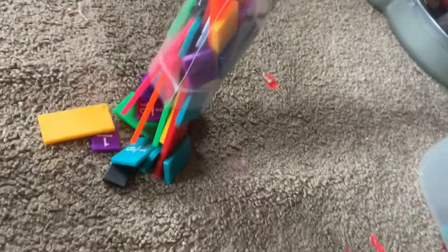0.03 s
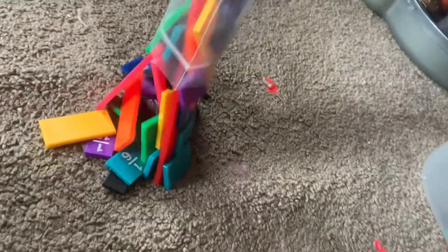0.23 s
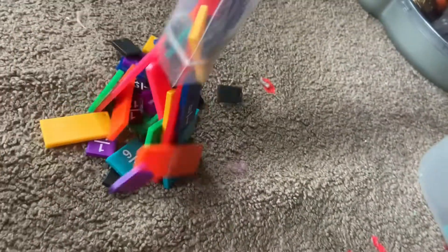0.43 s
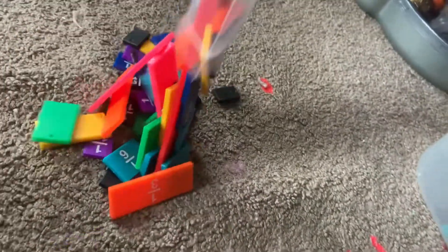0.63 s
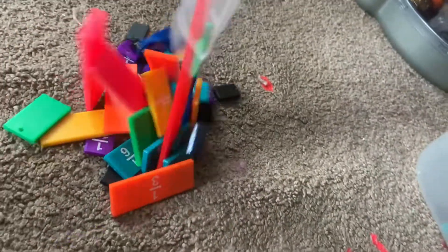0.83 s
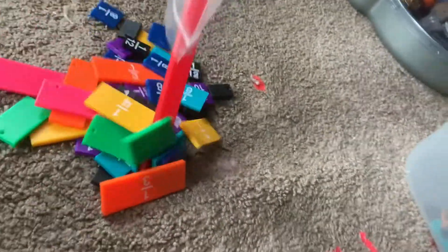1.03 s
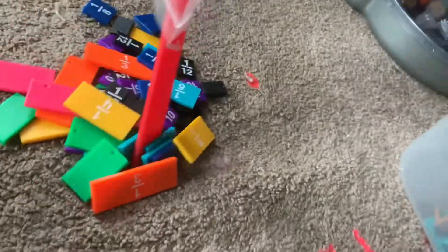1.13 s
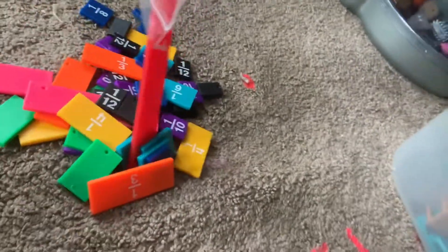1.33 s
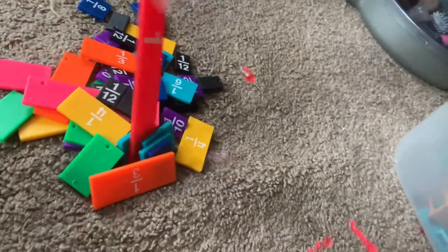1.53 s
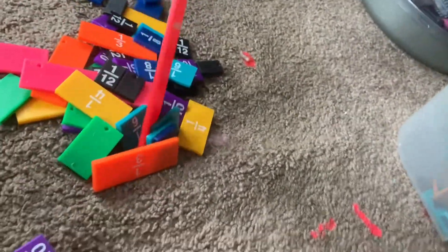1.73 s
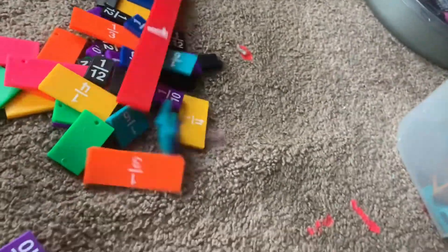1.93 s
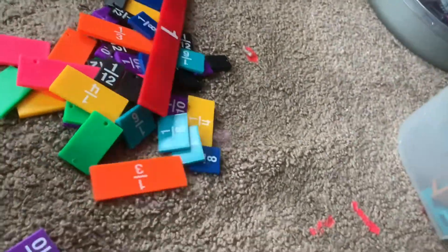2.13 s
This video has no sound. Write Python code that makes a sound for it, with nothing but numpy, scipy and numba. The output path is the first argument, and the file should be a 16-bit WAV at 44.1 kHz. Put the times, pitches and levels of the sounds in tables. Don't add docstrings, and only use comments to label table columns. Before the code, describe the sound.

Plastic tiles spill from a crinkling thin bag in a bright, dense clatter, thudding softly on carpet; after a quiet pause a long tile topples with a sharp clack. Close handheld phone, quiet room.

```python
import sys
import numpy as np
from scipy import signal
from scipy.fft import rfft, irfft
from scipy.io import wavfile
from scipy.ndimage import uniform_filter1d
from numba import njit

SR = 44100
rng = np.random.default_rng(int(sys.argv[2]) if len(sys.argv) > 2 else 0)


def gain_from_db(level_db):
    decades = np.asarray(level_db, float) / 20
    return 10 ** decades


def store_pcm(level_fs):
    pcm = np.round(np.clip(level_fs, -1, 1) * 32767).astype(np.int16)
    wavfile.write(sys.argv[1], SR, np.atleast_2d(pcm).T)


N = 97020

# (frequency [Hz], level [dB], time to fade by 60 dB [s])
TILE_MODES = [(1414, -8.5, 0.051), (1625, -2, 0.083), (2540, -9, 0.038), (2925, -15, 0.08),
              (3400, 1.5, 0.12), (3733, 14.5, 0.015), (4380, -5, 0.13), (4820, -56, 0.011),
              (5810, 7.5, 0.0058), (6170, -5, 0.12), (6210, 5.5, 0.16), (6580, 1.5, 0.063),
              (6800, -13, 0.027), (8142, -2, 0.17)]
# (frequency [Hz], level [dB])
CRACK_COLOUR = [(300, -61), (650, -16), (1050, -1.5), (3000, -0.5), (5500, 3), (8500, 0), (9500, -11),
                (14000, -16)]


def curve(table):
    points = np.array(table)
    return np.interp(np.arange(N) / SR, points[:, 0], points[:, 1])


def unit(x):
    return x / np.sqrt(np.mean(x ** 2))


def colour(x, table):
    hz = np.arange(N // 2 + 1) * SR / N + 1
    points = np.array(table)
    level_db = np.interp(np.log(hz), np.log(points[:, 0]), points[:, 1])
    return irfft(rfft(x) * gain_from_db(level_db), N)


def band(x, lo_hz, hi_hz):
    return signal.sosfilt(signal.butter(2, [lo_hz, hi_hz], "bandpass", fs=SR, output="sos"), x)


@njit
def rings(start, hz, t60, size, rise, n, sr):
    y = np.zeros(n)
    for k in range(len(start)):
        turn = np.exp(2j * np.pi * hz[k] / sr - np.log(1000.) / (t60[k] * sr))
        z = size[k] + 0j
        swell = 0.
        first = int(start[k] * sr)
        for i in range(max(first, 0), min(n, first + int(t60[k] * sr))):
            swell += (1 - swell) / (1 + rise[k] * sr)
            y[i] += swell * z.imag
            z *= turn
    return y


def ring(t, hz, t60, size, rise):
    every = np.broadcast_arrays(t, hz, t60, size, rise)
    flat = [np.ascontiguousarray(v, float).ravel() for v in every]
    return rings(*flat, N, float(SR))


def walk(rate):
    k = int(SR / rate)
    stairs = np.repeat(rng.standard_normal(N // k + 1), k)
    return unit(uniform_filter1d(uniform_filter1d(stairs, k), k)[:N])


def clicks(count, spread_db):
    u = rng.random((count, 3))
    size = gain_from_db(np.minimum(-spread_db * np.log(u[:, 1] + 1e-9), 18))
    x = np.zeros(N)
    np.add.at(x, (u[:, 0] * N).astype(int), size * np.sign(u[:, 2] - .5))
    return x


def crack_noise(kick, fade_s):
    gate = signal.lfilter([1], [1, -np.exp(-1 / (fade_s * SR))], kick)
    return colour(gate * rng.standard_normal(N), CRACK_COLOUR)


def thuds(table, cycles, db):
    events = np.array(table)
    ratio = np.array([1, 1.55])
    hz = events[:, 2:] * ratio
    size = gain_from_db(events[:, 1:2] + db - 22.4 * (ratio - 1))
    return ring(events[:, :1], hz, 2.93 * cycles / hz, size, 0.76 / hz)


def room():
    # (frequency [Hz], level [dB])
    room_colour = [(30, -13), (60, -29.5), (110, -7.5), (430, -0.5), (640, -20), (1500, -16.5),
                   (4000, -64.5), (14000, -46)]
    noise = rng.standard_normal((3, N))
    flutter_db = 2 * walk(9)
    ports = [colour(noise[0] + 1.6 * own, room_colour) for own in noise[1:]]
    return gain_from_db(-58.5 + flutter_db) * unit(np.array(ports))


def hand():
    # (time [s], level [dB])
    grip = [(0, -37), (.1, -41.5), (.5, -48), (.78, -48.5), (.9, -50), (1.1, -51), (1.5, -50.5),
            (1.68, -48.5), (2.2, -51.5)]
    noise = rng.standard_normal((3, N))
    low = band(0.45 * noise[0] + noise[1:], 43, 131)
    level_db = curve(grip) - 4 + 3.04 * walk(11.72)
    port_db = np.array([[1.5], [-1.2]])
    return gain_from_db(level_db) * unit(low) * gain_from_db(port_db)


def hand_knocks():
    # (time [s], peak level [dB], pitch [Hz])
    bumps = [(0.039, -52, 94.2), (0.07, -39, 85), (0.2, -46, 120), (0.361, -45, 86), (0.416, -35.5, 82.6),
             (0.642, -55, 71), (0.761, -36, 91), (0.895, -42.5, 92), (1.881, -49, 100), (1.973, -36, 76)]
    return thuds(bumps, cycles=4.46, db=2.5)


def bag():
    # (time [s], level [dB])
    handling = [(0, -38.5), (.05, -41), (.13, -41.5), (.4, -43), (.46, -52.5), (.6, -43.5), (1.1, -51),
                (1.31, -49), (1.34, -74.5), (1.43, -71.5), (1.465, -49.5), (1.52, -76.5), (1.56, -50.5),
                (1.7, -56), (1.75, -92), (1.79, -49), (1.97, -42.5), (2.12, -48.5)]
    # (frequency [Hz], level [dB])
    film_colour = [(250, -6.5), (450, -0.5), (650, -13), (1050, 2), (2400, -0.5), (3200, -8.5),
                   (6500, -12.5), (9500, -35)]
    flicker_db = 2.5 * walk(45)
    film = unit(colour(clicks(count=6000, spread_db=4.0), film_colour))
    return gain_from_db(curve(handling) + 1.5 + flicker_db) * film


def landings():
    # (time [s], peak level [dB], pitch [Hz])
    falls = [(0.017, -32, 426), (0.051, -28.5, 397), (0.26, -41.5, 440), (0.605, -33.5, 345),
             (0.787, -34.5, 293), (1.001, -37, 225), (1.16, -38.5, 390), (1.597, -36, 356),
             (1.859, -28, 440), (1.86, -27, 706), (1.968, -35.5, 440), (2.19, -37.5, 304)]
    return thuds(falls, cycles=2.4, db=8.5)


def ticks():
    # (time [s], peak level [dB], pitch [Hz])
    snaps = [(0.015, -19, 1210), (0.033, -12.5, 1740), (0.038, -22, 2040), (0.2, -18.5, 1260),
             (0.328, -33, 3880), (0.373, -25, 3860), (0.503, -16, 3900), (0.571, -24, 2040),
             (0.583, -30, 3920), (0.695, -27, 2110), (0.701, -28, 1120), (0.763, -21, 2510),
             (0.795, -29, 3640), (0.81, -17, 1510), (0.831, -32, 2490), (0.84, -27, 3670),
             (0.892, -31, 3660), (0.923, -42, 3700), (1.139, -33, 1620), (1.243, -33, 1820),
             (1.351, -32, 2230), (1.365, -61, 1150), (1.375, -58.5, 1800), (1.421, -41, 1490),
             (1.442, -48, 1100), (1.462, -35.5, 1780), (1.493, -43.5, 1440), (1.532, -55.5, 1310),
             (1.559, -37, 1360), (1.578, -44, 915), (1.61, -46, 1670), (1.631, -37, 856),
             (1.665, -41, 1720), (1.68, -48, 1130), (1.698, -50, 1550), (1.787, -30, 2410),
             (1.817, -37, 940), (1.967, -18, 2040), (2.161, -26.5, 1440)]
    ring_db, crack_db, cycles = 1.5, -3, 5
    events = np.array(snaps)
    kick = np.zeros(N)
    kick[(events[:, 0] * SR).astype(int)] = gain_from_db(events[:, 1] + crack_db)
    hz = events[:, 2:] * np.array([1, 1.6])
    knock = ring(events[:, :1], hz, cycles / hz, gain_from_db(events[:, 1:2] + ring_db), .0001)
    return knock + crack_noise(kick, fade_s=0.0004)


def pings():
    # (time [s], peak level [dB], pitch [Hz])
    strikes = [(0.0374, -32, 4380), (0.0777, -26, 6370), (0.0984, -21.5, 6290), (0.1361, -24, 6710),
               (0.158, -38, 6200), (0.2304, -12.5, 6290), (0.2424, -24, 6170), (0.2734, -16, 6170),
               (0.2964, -19, 6250), (0.4094, -28, 6720), (0.4933, -27, 6250), (0.6135, -12, 6260),
               (0.6474, -14, 6190), (0.6574, -24, 6300), (0.7004, -38, 6210), (0.7294, -30, 4460),
               (0.7494, -22, 6290), (0.8214, -17, 6270), (0.8504, -14, 6280), (0.8584, -25.5, 6260),
               (0.8654, -23, 6310), (0.8794, -24, 6770), (0.9113, -20.5, 6260), (0.9398, -15.5, 6290),
               (1.1374, -29.5, 6230), (1.1682, -40.5, 6290), (1.9174, -19, 6760), (1.9294, -33, 6290)]
    events = np.array(strikes)
    hz = events[:, 2:] * np.array([1, 1.025])
    size = gain_from_db(events[:, 1:2] - 5.5 + np.array([0, -6.0]))
    return ring(events[:, :1], hz, 0.033, size, 0.0017)


def rattle(count=1300):
    # (time [s], level [dB])
    pouring = [(0, -37), (.21, -38.5), (.26, -34.5), (.34, -36.5), (.46, -46.5), (.568, -44.5), (.572, -35),
               (.65, -33.5), (.74, -38.5), (.80, -32), (.89, -36), (.97, -33.5), (1.06, -41.5),
               (1.2, -53.5), (1.28, -68), (1.33, -74.5), (1.76, -76)]
    # (time [s], level [dB])
    toppling = [(1.76, -75), (1.785, -58), (1.85, -49.5), (1.9, -30), (1.95, -38), (2.0, -46),
                (2.015, -33.5), (2.1, -58.5), (2.2, -52.5)]
    mode_hz, mode_db, mode_t60 = np.array(TILE_MODES).T
    u = rng.random((count, 2))
    g = rng.standard_normal((count, 3, len(TILE_MODES)))
    contact_db = np.minimum(-3.0 * np.log(u[:, 1:] + 1e-9), 8)
    size = gain_from_db(contact_db + mode_db + 5.0 * np.clip(g[:, 0], -3, 1.5))
    hz = mode_hz * (1 + .014 * g[:, 1])
    t60 = .75 * mode_t60 * np.exp(.25 * g[:, 2])
    modes = ring(u[:, :1] * N / SR, hz, t60, size, .0006)
    flicker_db = 2.5 * walk(60)
    crack = unit(colour(clicks(count=3500, spread_db=1.5), CRACK_COLOUR))
    level_db = curve(pouring + toppling[1:]) + flicker_db
    return gain_from_db(level_db) * (unit(modes) + gain_from_db(-1.5) * crack)


def hits(count=7):
    # (time [s], peak level [dB], ringing tone [Hz], length of the clatter [s])
    pour = [(0.0173, -22, 7050, 0.008), (0.1783, -19.5, 6240, 0.01), (0.198, -27, 6260, 0.0072),
            (0.2498, -17.5, 6380, 0.008), (0.2664, -22, 6500, 0.0092), (0.3298, -23, 6170, 0.0066),
            (0.3747, -18, 4405, 0.0025), (0.5723, -25, 7240, 0.0069), (0.636, -16.5, 6170, 0.0063),
            (0.6918, -11, 5720, 0.01), (0.7647, -27, 7100, 0.008), (0.7826, -14.5, 6180, 0.0073),
            (0.8089, -15, 6120, 0.003), (0.9482, -19, 5940, 0.006), (0.9678, -17, 6300, 0.0058),
            (0.9956, -26.5, 6600, 0.0094), (1.0182, -20.5, 6700, 0.007), (1.052, -21.5, 3890, 0.01),
            (1.0885, -24, 3940, 0.011)]
    # (time [s], level [dB], tone [Hz], length [s])
    settle = [(1.2518, -32.5, 4500, 0.006), (1.2731, -28.5, 6450, 0.0068), (1.7796, -35, 5180, 0.0081),
              (1.855, -20.5, 4460, 0.0087), (1.8869, -19, 6510, 0.014), (1.897, -10.5, 6700, 0.006),
              (1.9128, -14, 7080, 0.006), (1.9718, -49, 4380, 0.006), (2.009, -23.5, 4370, 0.0048),
              (2.0333, -37, 6300, 0.006), (2.0794, -36.5, 5870, 0.0029), (2.161, -39, 4560, 0.0057),
              (2.1924, -29.5, 2530, 0.005)]
    # (time [s], peak level [dB], pitch [Hz])
    long_tiles = [(0.3114, -25.5, 2900), (0.6457, -26, 1635), (0.9651, -20.5, 1603), (1.004, -27, 2940),
                  (1.0541, -26, 1695), (1.1029, -28.5, 1620), (1.229, -48, 2900), (1.9036, -24, 1430),
                  (1.917, -32, 1570), (1.9395, -27, 1575)]
    ring_db, body_db, others_db, crack_db = -9, -1, -26, -16
    events = np.array(pour + settle)
    mode_hz, mode_db, mode_t60 = np.array(TILE_MODES).T
    u = rng.random((len(events), count))
    g = rng.standard_normal((len(events), count, 30))

    late = np.sort(u, 1) - u.min(1, keepdims=True)
    t = events[:, :1] + events[:, 3:] * late
    size = gain_from_db(events[:, 1:2] + 2.5 * g[..., 0] - 1.5 * late)

    strong_hz = events[:, 2:3] * (1 + 0.0018 * g[..., 1])
    strong = ring(t, strong_hz, 0.014, size * gain_from_db(ring_db), 0.00045)

    other_hz = mode_hz * (1 + .03 * g[..., 2:16])
    other_size = size[..., None] * gain_from_db(others_db + mode_db * 0.54 + 2.5 * g[..., 16:])
    others = ring(t[..., None], other_hz, .5 * mode_t60, other_size, 0.00017)

    big = np.array(long_tiles)
    bodies = ring(big[:, 0], big[:, 2], 0.047, gain_from_db(big[:, 1] + body_db), 0.0017)

    kick = np.zeros(N + SR)
    np.add.at(kick, (t * SR).astype(int), size)
    cracks = crack_noise(kick[:N], fade_s=0.00099)
    return strong + others + bodies + gain_from_db(crack_db) * cracks


def reflections(sound, count=24):
    k = np.arange(SR // 8) / SR
    fade = np.exp(-np.log(1000) * k / .06) * (k > .001)
    tail = rng.standard_normal((count + 1, 2, len(k))) * fade
    tail = tail / np.sqrt((tail ** 2).sum(2, keepdims=True))
    place = np.arange(N) * count / N
    share = np.clip(1 - np.abs(place - np.arange(count + 1)[:, None]), 0, 1) ** .5
    return signal.fftconvolve((share * sound)[:, None], tail, axes=2)[..., :N].sum(0)


def scene():
    tile_lag, film_lag = 20, 9
    tiles = rattle() + hits() + ticks() + pings()
    film = bag()
    thud = landings()
    right = tiles + film + thud
    left = np.roll(tiles, tile_lag) + np.roll(film, film_lag) + thud
    direct = np.array([gain_from_db(1.45) * left, right])
    return direct + gain_from_db(-5) * reflections(right) + hand() + hand_knocks() + room()


def roll_off(x):
    return signal.sosfilt(signal.butter(12, 15600, fs=SR, output="sos"), x)


def record(dry):
    top_hz = 10250
    left = signal.sosfiltfilt(signal.butter(2, top_hz, fs=SR, output="sos"), dry[0])
    right = signal.sosfiltfilt(signal.butter(3, 0.72 * top_hz, fs=SR, output="sos"), dry[1])
    return roll_off(np.array([left, right]))


dry = scene()
out = record(dry)
store_pcm(out)
```